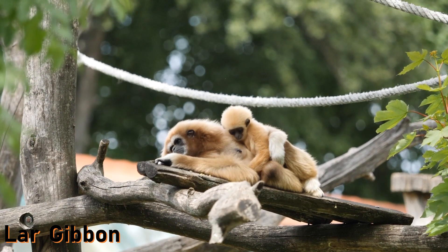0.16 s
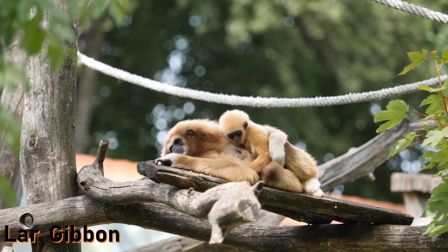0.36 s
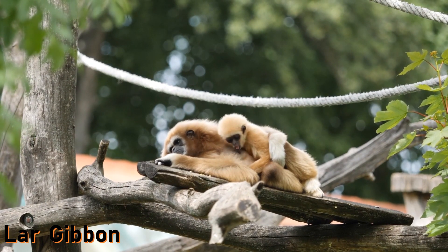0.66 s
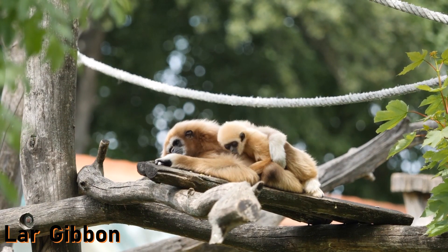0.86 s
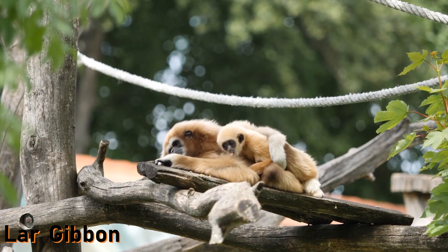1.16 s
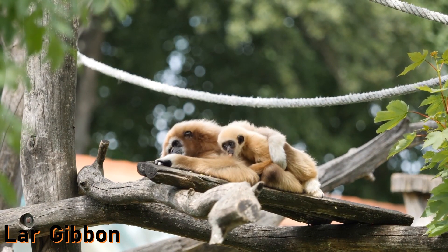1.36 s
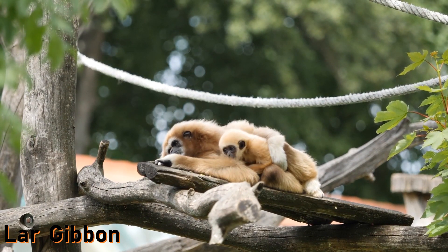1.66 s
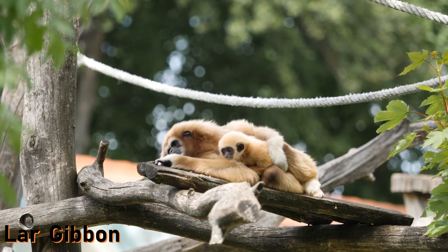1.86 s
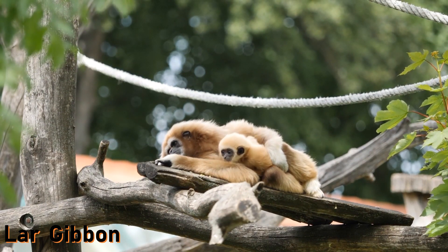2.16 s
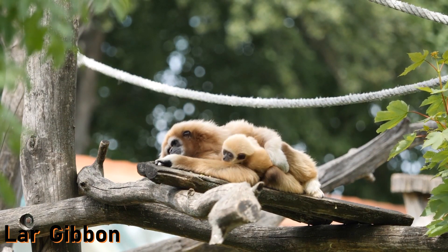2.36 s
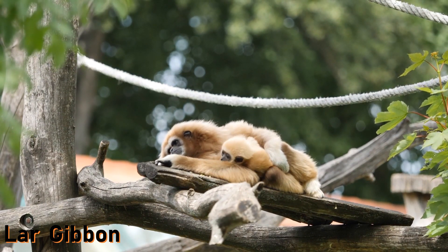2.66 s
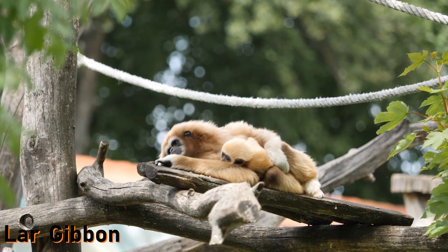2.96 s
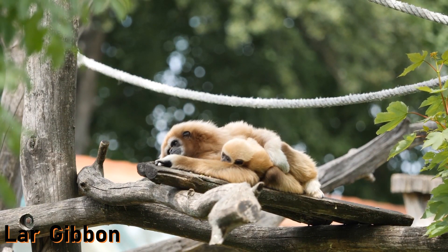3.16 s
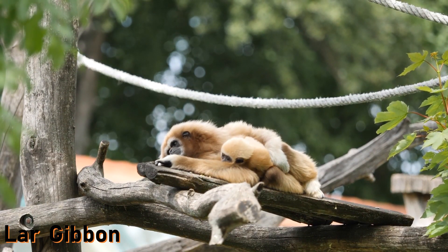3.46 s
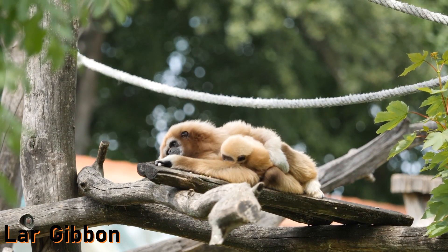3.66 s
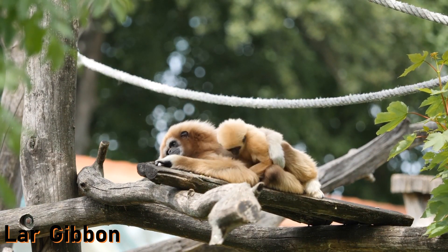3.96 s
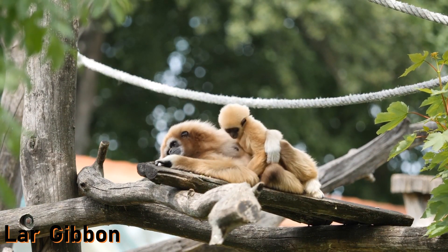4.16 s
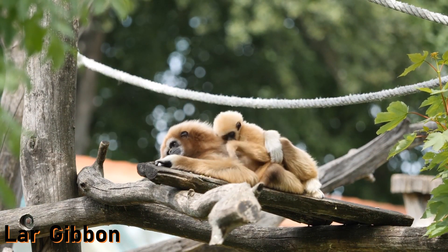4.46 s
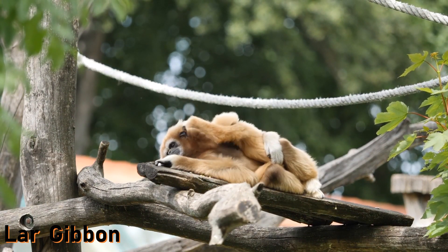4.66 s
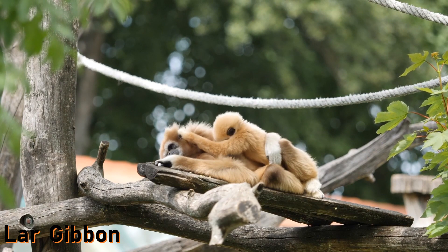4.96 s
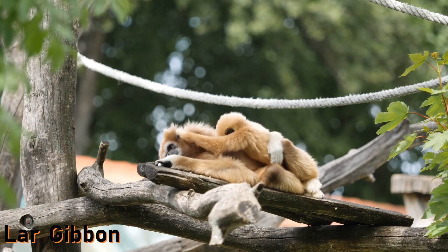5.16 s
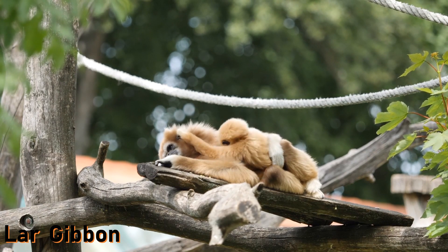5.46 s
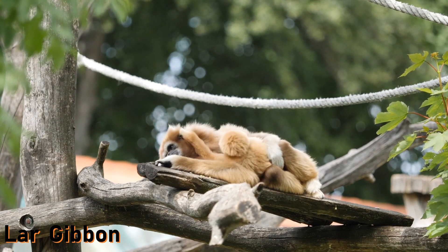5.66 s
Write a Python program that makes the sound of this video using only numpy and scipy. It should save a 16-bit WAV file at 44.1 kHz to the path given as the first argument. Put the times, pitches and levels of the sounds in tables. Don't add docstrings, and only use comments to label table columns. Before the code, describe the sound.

A single gibbon calls close to the microphone in an outdoor zoo enclosure. Two raspy grunts open, then evenly spaced round hoots grow louder with hoarse gasps between them. Whoops rise into six longer, wide-open screams with a rough, splitting edge. Faint low hoots, grunts and a few returning hoots finish. A soft low motor hum and rumble lie beneath, with short reflections from nearby walls.

```python
import sys
import numpy as np
from scipy import signal
from scipy.fft import rfft, irfft
from scipy.io import wavfile
from scipy.ndimage import uniform_filter1d

SR = 44100
rng = np.random.default_rng(int(sys.argv[2]) if len(sys.argv) > 2 else 0)


def materialize(psi):
    bounded = np.clip(np.atleast_2d(psi).T, -1, 1)
    quanta = np.round(bounded * 32767).astype(np.int16)
    wavfile.write(sys.argv[1], SR, quanta)


def volts_from_db(level):
    exponent = np.asarray(level, float) / 20
    return 10 ** exponent


N = 256662


def at(table, hz):
    f, db = np.transpose(table)
    return np.interp(np.log(np.maximum(hz, 1)), np.log(f), db)


def unit(x):
    return x / np.sqrt(np.mean(x ** 2))


def colour(x, table, tilt_db=0.):
    hz = np.linspace(0, SR / 2, num=2049)
    gain_db = at(table, hz) + tilt_db * np.log2(np.maximum(hz, 100) / 1000)
    ceps = irfft(gain_db * np.log(10) / 20)
    ceps[1:2048] *= 2
    ceps[2049:] = 0
    response = irfft(np.exp(rfft(ceps)))
    return signal.fftconvolve(x, response)[:N]


def walk(rate):
    k = max(int(SR / rate), 1)
    return unit(uniform_filter1d(uniform_filter1d(rng.standard_normal(N), k), k))


# frequency in Hz, level in dB per Hz.
YARD_SPECTRUM = [(15, -64.5), (25, -1), (145, -11.5), (456, -25), (518, -20.5), (1470, -37), (2580, -40),
                 (4290, -46), (5530, -46.5), (11000, -54.5), (14300, -102), (22000, -120)]


def yard():
    mid = unit(colour(rng.standard_normal(N), YARD_SPECTRUM))
    side = unit(colour(rng.standard_normal(N), YARD_SPECTRUM))
    swell_db = 9. * np.exp(-np.arange(N) / SR / .5) + 1.8 * walk(4)
    return volts_from_db(-45 + swell_db) * (mid + 0.38 * side * np.array([[1], [-1]]))


# time in seconds, pitch in Hz, level in dB.
HUM_PATH = [(0.0, 113, -42), (0.08, 115.6, -33), (0.139, 107.9, -36), (0.34, 62.6, -38.5), (0.55, 61, -41),
            (0.84, 64.26, -44), (0.94, 78.7, -41.5), (2.38, 77.52, -32.5), (2.59, 78.46, -47.5),
            (2.98, 81.5, -34), (3.53, 81.8, -44.5), (3.69, 54.63, -49.5), (4.41, 54.34, -42),
            (4.59, 56.93, -42.5), (4.88, 88.66, -54), (5.72, 93.4, -46.5), (5.82, 91.9, -53)]


def hum():
    s, hz, db = np.transpose(HUM_PATH)
    t = np.arange(N) / SR
    wavering_hz = np.interp(t, s, hz) * (1 + 0.0258 * walk(11.1))
    phase = 2 * np.pi * np.cumsum(wavering_hz) / SR
    level_db = np.interp(t, s, db) + 1.1 * walk(42)
    return np.sqrt(2) * volts_from_db(level_db) * np.sin(phase)


def turbulence(patchy_db):
    spec = signal.stft(rng.standard_normal(N), nperseg=512)[2]
    patches = uniform_filter1d(rng.standard_normal(spec.shape), size=4, axis=0)
    patches = uniform_filter1d(patches, size=9, axis=1)
    return signal.istft(spec * volts_from_db(patchy_db * unit(patches)), nperseg=512)[1][:N]


def top_rms(x):
    band = signal.butter(4, (4500, 10500), "bandpass", fs=SR, output="sos")
    return np.std(signal.sosfilt(band, x))


# frequency in Hz, gain in dB.
ROUND_LIPS = [(150, -8.5), (430, 7), (640, -1), (950, 10.5), (1130, -2.5), (1300, -11.5), (1900, -38.5),
              (2400, -11), (2800, -25), (3400, -23), (4450, -20.5), (6100, -12.5), (7900, -25),
              (9300, -22.5)]
# centre in Hz, width in Hz.
SIDE_POCKETS = [(1750, 700), (3980, 350), (3980, 350), (4980, 350), (4980, 350), (7850, 600), (7850, 500),
                (10900, 900)]


def throat(x, mouth, wide_table, norm, tilt_db=0.):
    shut = colour(x, ROUND_LIPS, tilt_db)
    wide = colour(x, wide_table, tilt_db)
    for hz, width in SIDE_POCKETS:
        shut = signal.lfilter(*signal.iirnotch(hz, hz / width, fs=SR), shut)
    return np.sqrt(1 - mouth) * shut / norm(shut) + np.sqrt(mouth) * wide / norm(wide)


# frequency in Hz, gain in dB.
GASPING_THROAT = [(200, -23), (450, -11.5), (720, 2), (1100, 7), (1500, 2.5), (2050, -10.5), (2800, -2),
                  (3300, -2.5), (4000, -12.5), (11000, -24.5)]
# start in seconds, end in seconds, rasp rate in Hz, rasp in dB, breath in dB.
HOARSE_PANTS = [(0.333, 0.428, 210.1, -30.5, -50), (0.555, 0.625, 206, -30.5, -50),
                (0.761, 0.874, 207.1, -30.5, -47.5), (1.02, 1.125, 224.4, -31, -49),
                (1.268, 1.358, 218.3, -45, -46.5), (1.495, 1.582, 207.4, -34.5, -46),
                (1.688, 1.817, 215.6, -42.5, -52), (1.938, 2.029, 206, -30.5, -49),
                (2.169, 2.222, 208.3, -39.5, -63.5), (2.333, 2.422, 184.5, -32.5, -46.5),
                (2.556, 2.658, 212.9, -33.5, -44), (2.834, 2.947, 178.3, -35.5, -49),
                (3.185, 3.265, 185.9, -33, -54), (3.527, 3.61, 322.3, -39.5, -51.5),
                (3.89, 3.981, 330.3, -43, -54), (4.807, 4.919, 251.7, -32.5, -59),
                (5.208, 5.269, 240, -36, -54.5), (5.775, 5.85, 242, -41, -69)]
# start in seconds, end in seconds, rasp rate in Hz, rasp in dB, breath in dB.
DYING_GRUNTS = [
    (0, 0.035, 226.2, -31, -48.5),
    (0.056, 0.14, 224, -26.5, -45),
    (4.924, 5.014, 237.4, -31.5, -49.5),
    (5.082, 5.191, 212.7, -34, -50.5),
]


def pants(mouth):
    t = np.arange(N) / SR
    hz, rasp, breath = np.full(N, 200.), np.zeros(N), np.zeros(N)
    breaths = [(*row, 0.55) for row in HOARSE_PANTS] + [(*row, 0.241) for row in DYING_GRUNTS]
    for start, end, rate_hz, rasp_db, breath_db, top in breaths:
        on = (t >= start) & (t < end)
        u = (t[on] - start) / (end - start)
        swell = np.sin(np.pi * u ** (np.log(.5) / np.log(top)))
        hz[on] = rate_hz * (.86 + 0.15 * swell)
        rasp[on] = volts_from_db(rasp_db) * swell ** 0.78
        breath[on] = volts_from_db(breath_db) * swell ** 0.84
    slap = np.floor(np.cumsum(2 * hz * (1 + .026 * walk(70))) / SR)
    weak_db = -(slap % 2) * (6.85 + 8.5 * mouth)
    uneven_db = (1.7 + .3 * mouth) * rng.standard_normal(N)[slap.astype(int)]
    size_db = weak_db + uneven_db + 1.7 * walk(45)
    clicks = np.diff(slap, prepend=0) * volts_from_db(size_db)
    slaps = np.diff(clicks, prepend=0)
    air = turbulence(patchy_db=3.5) * volts_from_db(1.5 * walk(40))
    raspy = rasp * throat(slaps, mouth, GASPING_THROAT, np.std, tilt_db=-15.5)
    return raspy + breath * throat(air, mouth, GASPING_THROAT, top_rms, tilt_db=0.0)


# start in seconds, length in seconds, top pitch in Hz, voice in dB,
# effort peak as a share of the length. Hoots come through rounded lips.
HOOT_CALLS = [(.21, 0.094, 395.8, -24, 0.63), (.44, 0.086, 428.4, -18.5, .58), (.64, 0.1, 438.6, -14, 0.49),
              (.885, 0.12, 458.4, -13.5, 0.5), (1.135, 0.11, 470.6, -13.5, 0.56),
              (1.37, 0.11, 478.7, -13.5, 0.49), (1.585, 0.097, 483, -12.5, 0.5),
              (1.84, 0.09, 453.6, -22.5, .45), (4.22, 0.1155, 300.8, -43, 0.405),
              (4.6, .11, 289.6, -44.5, .42), (4.71, .095, 217.4, -29.5, 0.42),
              (5.283, .112, 453.8, -25, 0.36), (5.44, 0.13, 473.7, -24, 0.46),
              (5.64, 0.12, 490.7, -18, 0.49)]
WHOOP_CALLS = [
    (2.043, 0.12, 514.7, -14.5, 0.55),
    (2.232, .088, 536.7, -22.5, 0.49),
    (2.43, .114, 606.4, -18, 0.55),
]
SCREAM_CALLS = [
    (2.671, .162, 660, -19.5, 0.39),
    (2.96, 0.23, 669.4, -21.5, 0.52),
    (3.29, .232, 718, -19.5, 0.53),
    (3.64, 0.23, 703.3, -17, 0.58),
    (3.98, .232, 739.5, -18.5, .52),
    (4.355, .228, 698.5, -19.5, .56),
]
# start in seconds, end in seconds, pitch in Hz, voice in dB.
REGISTER_CRACKS = [
    (1.84, 1.864, 280, -26.5),
    (2.665, 2.718, 500, -18.5),
    (5.28, 5.314, 274.1, -28),
]
# time in seconds, top pitch in Hz, level in dB over the voice,
# half length in seconds, added breath in dB.
FOLD_SURGES = [(2.699, 1120, 9.5, 0.014, 5.5), (2.76, 1100, -4.5, 0.08, 3.5), (3.0, 1120, -5.5, 0.023, 1.5),
               (3.095, 1270, 8, 0.025, 5), (3.345, 1195, 2.5, .02, 5.5), (3.415, 1300, 4, 0.041, 1),
               (3.69, 1150, -6.5, 0.029, 5), (3.81, 1230, -8.5, 0.023, -0.5), (4.13, 1250, 1, 0.061, 4),
               (4.405, 1090, 2, 0.037, 2), (4.488, 1388, 0, 0.031, 1.5)]
HOOT_PITCH, WHOOP_PITCH, SCREAM_PITCH = (.55, .48, 2.4), (.58, .45, 2.2), (.42, .36, 4.1)
# voice fall in dB, flatness, breath in dB, breath dB per voice dB, breath fall in dB.
HOOT_LEVEL, WHOOP_LEVEL = (26.5, 2.04, -43.5, .5, 16.5), (25.5, 3, -38.5, -0.4, 19.5)
SCREAM_LEVEL = (23, 5.5, -33.5, 1.17, 15.5)


def calls(mouth):
    attack_s, release_s = 0.0075, 0.011
    sag_hz_per_s, floor_hz, rest_db = 4600, 980, -15.5
    t = np.arange(N) / SR
    gate, hz = np.zeros(N), np.full(N, 250.)
    voice_db, breath_db = np.full(N, -60.), np.full(N, -70.)
    screaming = np.zeros(N, bool)
    kinds = [(HOOT_CALLS, HOOT_PITCH, HOOT_LEVEL, False),
             (WHOOP_CALLS, WHOOP_PITCH, WHOOP_LEVEL, False),
             (SCREAM_CALLS, SCREAM_PITCH, SCREAM_LEVEL, True)]
    for table, (first, last, flat), (fall_db, flat_level, air_db, air_share, air_fall_db), is_scream in kinds:
        for start, length, top_hz, top_db, top in table:
            on = (t >= start) & (t < start + length)
            u = (t[on] - start) / length
            bend = np.log(.5) / np.log(np.clip(top, .1, .9))
            slack = np.abs(2 * u ** bend - 1)
            hz[on] = top_hz * (1 - (1 - np.where(u < top, first, last)) * slack ** flat)
            voice_db[on] = top_db - fall_db * slack ** flat_level
            breath_db[on] = air_db + air_share * (top_db + 19) - air_fall_db * slack ** 2
            ramps = np.minimum(u * length / attack_s, (1 - u) * length / release_s)
            gate[on] = np.minimum(ramps, 1) ** 2
            screaming[on] = is_scream
    for start, end, low_hz, low_db in REGISTER_CRACKS:
        on = (t >= start) & (t < end)
        hz[on], voice_db[on] = low_hz, low_db
    hz = hz * (1 + .008 * walk(35))
    voice_db = voice_db + 1.3 * walk(45)

    coarse = t[::50]
    s, top_hz, over_db, half, air_db = (c[:, None] for c in np.transpose(FOLD_SURGES))
    near = np.exp(-np.abs((coarse - s) / half) ** 3)
    climb_hz = np.max(top_hz - sag_hz_per_s * np.abs(coarse - s), axis=0)
    free_hz = np.maximum(np.interp(t, coarse, climb_hz), floor_hz)
    free_db = rest_db + np.interp(t, coarse, np.max((over_db - rest_db) * near, axis=0))
    second_hz = np.where(screaming, free_hz, 1.32 * hz)
    second_db = np.where(screaming, free_db, -12 - 16 * mouth)
    breath_db = breath_db + np.interp(t, coarse, np.sum(air_db * near, axis=0))
    return gate, [uniform_filter1d(c, size=200) for c in (hz, voice_db, second_hz, second_db, breath_db)]


# frequency in Hz, gain in dB.
WIDE_OPEN = [(200, -65.5), (450, -17), (700, -14), (1150, -4.5), (1400, -1), (2050, -7.5), (2400, -17),
             (3200, -11.5), (4300, -21.5), (4900, -20.5), (6600, -32), (8500, -26.5), (9200, -31.5),
             (11000, -36.5)]


def partials(hz, phase, mouth, tilt_db):
    top_hz, width_hz, top_db = 1400, 440, 18
    bump = np.exp(-((hz - top_hz) / width_hz) ** 2) - (hz > top_hz + width_hz)
    half_db = top_db * np.sin(np.pi * mouth) * bump
    lips_db = -11 * (1 - mouth) ** 2 * (hz > 2000)
    throat_db = (1 - mouth) * at(ROUND_LIPS, hz) + mouth * at(WIDE_OPEN, hz)
    gain = volts_from_db(lips_db + half_db + throat_db + tilt_db * np.log2(hz / 1000))
    return np.sqrt(2) * np.sum(gain * np.sin(phase), axis=0) / np.sqrt(np.sum(gain ** 2, axis=0))


def hoots(mouth):
    gate, (hz, voice_db, second_hz, second_db, breath_db) = calls(mouth)
    k = np.arange(1, 9)[:, None]
    phase = 2 * np.pi * np.cumsum(hz * (1 + .0018 * walk(90))) / SR
    second = 2 * np.pi * np.cumsum(second_hz * (1 + .015 * walk(60))) / SR
    softness_db = .6 * np.minimum(voice_db + 25, 0)
    tilt_db = softness_db - 7.5 + 5 * mouth ** 4
    shimmer_db = (1.3 + 2.2 * np.sin(np.pi * mouth)) * walk(200)
    tone = partials(k * hz, k * phase + .8 * k, mouth, tilt_db) * volts_from_db(shimmer_db)
    side = partials(second_hz + (k - 1) * hz, second + (k - 1) * phase, mouth, tilt_db=2 - 8 * mouth)
    side = side * volts_from_db(second_db + 2.5 * walk(70))
    puffs = turbulence(patchy_db=3.5) * (1 + .5 * np.cos(phase)) * volts_from_db(1.5 * walk(50))
    breath = volts_from_db(breath_db) * throat(puffs, mouth, WIDE_OPEN, top_rms, tilt_db=4.0)
    return gate * (volts_from_db(voice_db) * (tone + side) + breath)


# time in seconds, mouth opening from 0 to 1.
MOUTH_OPENING = [(0, 0.56), (.07, 0), (0.202, 0), (2.019, 0.01), (2.045, 0.93), (2.601, 0.97), (2.68, 0.98),
                 (4.21, 0.99), (4.239, 0.51), (4.33, 0.44), (4.36, 1), (4.59, 0.98), (4.62, 0.53),
                 (4.71, 0), (5.82, 0.02)]


def scene():
    s, opening = np.transpose(MOUTH_OPENING)
    t = np.arange(N) / SR
    mouth = np.clip(np.interp(t, s, opening), 0, 1)
    ape = hoots(mouth) + pants(mouth)
    lag = np.arange(SR // 2) / SR
    decay = volts_from_db(-41.5 - 60 * lag / 0.043) + volts_from_db(-56.0 - 60 * lag / 0.61)
    tails = rng.standard_normal((2, len(lag))) * decay
    tails = tails + volts_from_db(2.5) * np.diff(tails, prepend=0)
    echo = np.array([signal.fftconvolve(ape, tail)[:N] for tail in tails])
    return ape + hum() + echo + yard()


def round_peaks(x):
    knee = .5
    over = np.maximum(np.abs(x) - knee, 0)
    return x - np.sign(x) * (over - (.9 - knee) * np.tanh(over / (.9 - knee)))


def top_cut(x):
    return signal.sosfilt(signal.butter(12, 11610, fs=SR, output="sos"), x)


# frequency in Hz, left minus right in dB.
LEFT_OVER_RIGHT = [(60, 4), (300, 1.9), (1000, 1.3), (3000, 1), (8000, .2)]


def record(dry):
    left = colour(dry[0], [(hz, db / 2) for hz, db in LEFT_OVER_RIGHT])
    right = colour(dry[1], [(hz, -db / 2) for hz, db in LEFT_OVER_RIGHT])
    rounded = round_peaks(np.array([left, right]))
    cut = signal.sosfilt(signal.ellip(10, .2, 70, 10850, fs=SR, output="sos"), rounded)
    cut = signal.sosfilt(signal.butter(2, 53, "highpass", fs=SR, output="sos"), cut)
    return top_cut(cut)


dry = scene()
out = record(dry)
materialize(out)
```